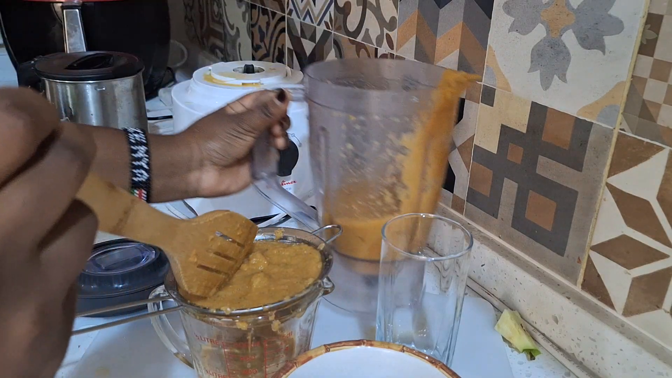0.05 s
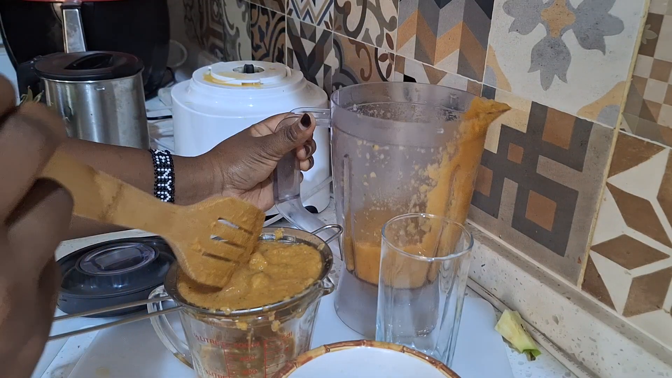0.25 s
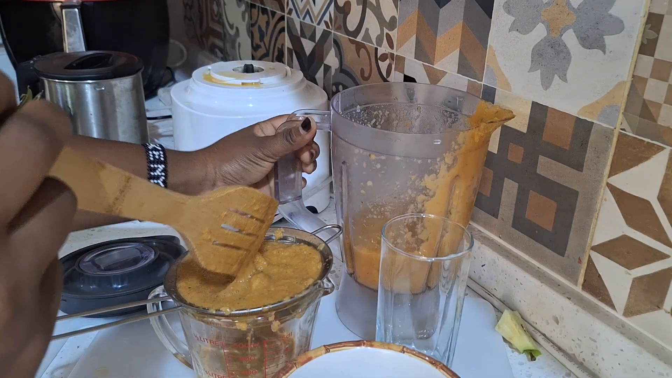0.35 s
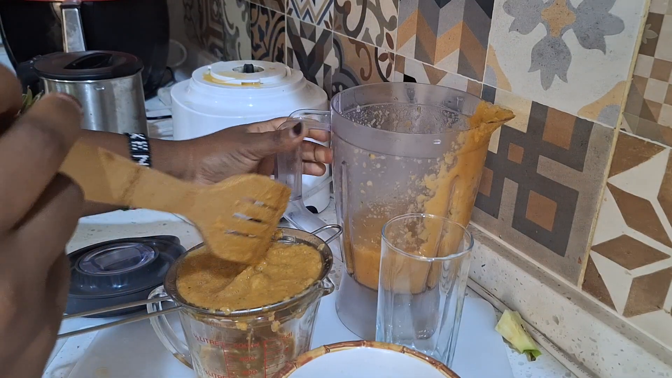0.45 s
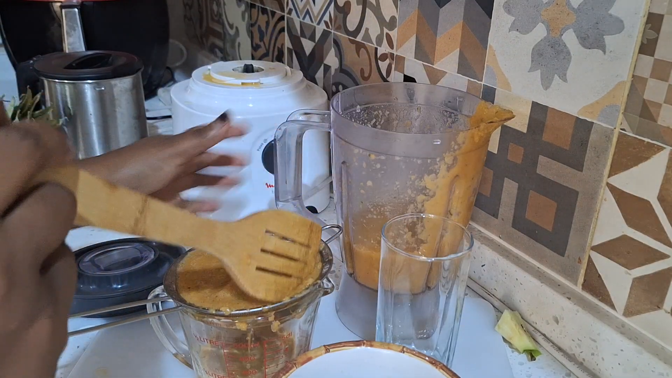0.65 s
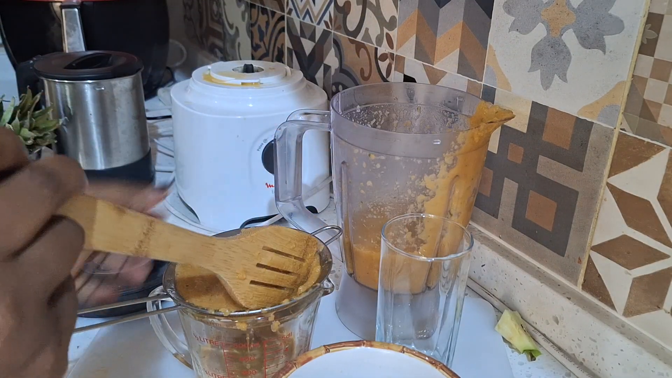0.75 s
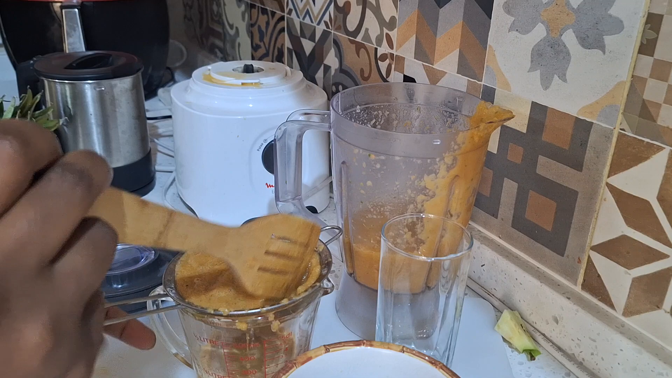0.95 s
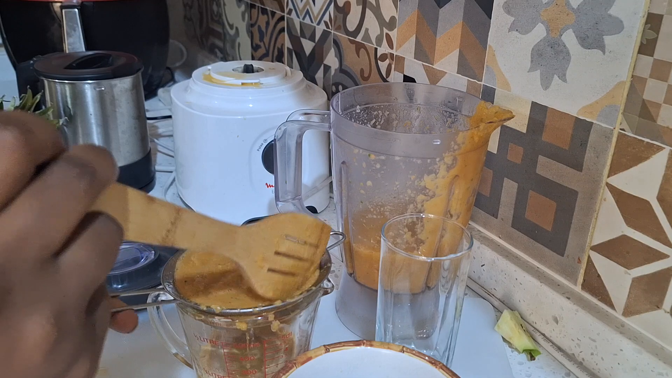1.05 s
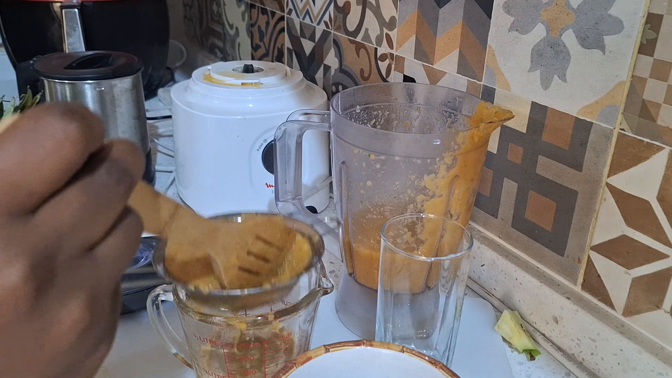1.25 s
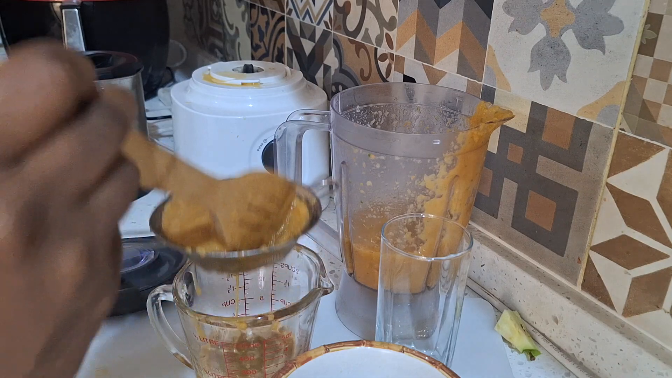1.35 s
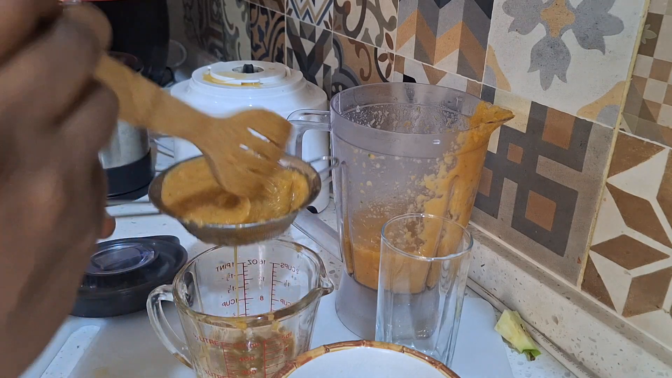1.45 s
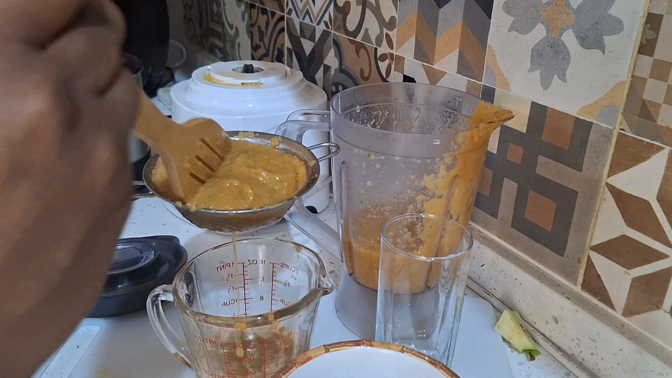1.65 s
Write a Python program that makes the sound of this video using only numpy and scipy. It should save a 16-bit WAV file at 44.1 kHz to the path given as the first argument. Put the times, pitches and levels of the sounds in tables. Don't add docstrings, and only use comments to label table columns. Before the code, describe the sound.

One loud, boomy plastic knock with a crack and short rattle early on, then near quiet over fridge hum, faint juice fizz and wooden spatula ticks, ending in small sieve taps and scrape on glass, in a tiled kitchen.

```python
import sys
import numpy as np
from scipy import signal
from scipy.fft import rfft, irfft
from scipy.io import wavfile
from scipy.ndimage import uniform_filter1d

SR = 44100
rng = np.random.default_rng(int(sys.argv[2]) if len(sys.argv) > 2 else 0)


def ratio_of_db(decibels):
    return 10 ** (np.asarray(decibels, float) / 20)


def output_pcm(signal):
    pcm = np.clip(np.atleast_2d(signal).T, -1, 1) * 32767
    wavfile.write(sys.argv[1], SR, np.round(pcm).astype(np.int16))


N = 74970

# f/Hz, correlation/1
EAR_LIKENESS = [(60, 1), (150, 0.81), (380, 0.57), (950, 0.073), (2400, 0.05), (15000, 0.016)]


def evened(x):
    return x / np.sqrt(np.mean(x ** 2) + 1e-20)


def read(points, hz):
    f, value = np.transpose(points)
    return np.interp(np.log(hz + 1), np.log(f + 1), value)


def curve_db(points, **ends):
    return np.interp(np.arange(N) / SR, *np.transpose(points), **ends)


def add(mix, s, sound):
    part = mix[..., round(max(s, 0) * SR):][..., :sound.shape[-1]]
    part += sound[..., :part.shape[-1]]


def colour(x, points):
    hz = np.fft.rfftfreq(x.shape[-1], 1 / SR)
    return irfft(rfft(x) * ratio_of_db(read(points, hz)), x.shape[-1])


def wander(rate_hz):
    t = np.arange(N) / SR
    ratios = np.geomspace(.1, 1, num=12)
    return evened(sum(np.sin(2 * np.pi * (f * rate_hz * t + rng.random())) / np.sqrt(f) for f in ratios))


def gritty(shape, base, gain, spread_db, rate_hz):
    peaks = ratio_of_db(spread_db * rng.exponential(1, N))
    return rng.standard_normal(shape) * (base + gain * peaks * (rng.random(N) < rate_hz / SR))


def ring(modes, rise_s):
    t = np.arange(12000) / SR
    out = np.zeros(len(t))
    for hz, db, t60 in modes:
        out += ratio_of_db(db - 60 * t / max(t60, .003)) * np.sin(2 * np.pi * hz * t)
    return out * (1 - np.exp(-t / rise_s))


def puff(points, t60):
    t = np.arange(4096) / SR
    z = rfft(rng.standard_normal(4096) * ratio_of_db(-60 * t / t60))
    even = irfft(z / np.sqrt(uniform_filter1d(abs(z) ** 2, size=30)), 4096)
    attack = np.minimum(t[:3000] / 0.000067, 1)
    burst = colour(even, points)[:3000] * attack
    return burst / np.sqrt(np.sum(burst ** 2) / (t60 * SR / 14))


def stroke(length_s, rise_s, fall_s):
    t = np.arange(0, length_s, 1 / SR)
    return np.clip(np.minimum(t / rise_s, (length_s - t) / fall_s), 0, 1)


def ticks(table):
    out = np.zeros(N)
    steps = np.linspace(-4, 4, num=17)
    for s, db, hz, octaves, t60 in table:
        bell = np.transpose([hz * 2 ** (steps * octaves), -4.3 * steps ** 2])
        add(out, s, ratio_of_db(db) * puff(bell, t60))
    return out


def to_left(x, lag_s, balance):
    hz = np.fft.rfftfreq(N, 1 / SR)
    return irfft(rfft(x) * np.exp(-2j * np.pi * hz * lag_s) * ratio_of_db(read(balance, hz)), N)


def air():
    # f/Hz, level/dB per Hz
    air_spectrum = [(20, -16), (45, -13), (105, -4), (170, -25.5), (550, -27), (900, -39), (2500, -55.5),
                    (16000, -65)]
    air_rms_db = -45.5
    # f/Hz, width/Hz, level/dB rms
    room_tones = [(63.2, 8.3, -50.5), (132, 36.5, -48.5), (331, 46, -62)]
    hz = np.fft.rfftfreq(N, 1 / SR)
    a, b = rfft(rng.standard_normal((2, N)))
    same = np.clip(read(EAR_LIKENESS, hz), -1, 1)
    base = ratio_of_db(read(air_spectrum, hz))
    density = ratio_of_db(2 * air_rms_db) * base ** 2 / np.mean(base ** 2)
    for f_hz, width_hz, db in room_tones:
        bump = np.exp(-.5 * ((hz - f_hz) / (width_hz / 2)) ** 2)
        density = density + ratio_of_db(2 * db) * bump / bump.mean()
    return irfft(np.array([a, same * a + np.sqrt(1 - same ** 2) * b]) * np.sqrt(density), N)


def hum():
    # f/Hz, level/dB rms
    motor_lines = [(100.5, -43.5), (147, -61), (197, -67.5)]
    # t/s, level/dB
    motor_load = [(0, 8), (.15, 6), (.55, 7), (.75, -2), (.88, 1.5), (.98, 7), (1.1, 0), (1.25, 5),
                  (1.381, 2), (1.449, 6.5), (1.55, 2), (1.65, 8)]
    out = np.zeros(N)
    for hz, db in motor_lines:
        turns = np.cumsum(hz + 1.055 * wander(3.87)) / SR + rng.random()
        out += ratio_of_db(db + 1.5 + 0.5 * wander(7.6)) * np.sin(2 * np.pi * turns)
    return ratio_of_db(curve_db(motor_load)) * out


def earlier():
    # f/Hz, level/dB per Hz
    tail_spectrum = [(120, -10), (200, 3), (600, 3.5), (1000, -10.5), (2000, -19.5), (3500, -29),
                     (6000, -49.5)]
    start_db, t60_s = -56.5, 2.1
    a, b = rng.standard_normal((2, N))
    tail = evened(colour(np.array([a + 1.0 * b, a - 0.7 * b]), tail_spectrum))
    return tail * ratio_of_db(start_db - 60 * np.arange(N) / SR / t60_s + 0.91 * wander(16.0))


def kitchen(x):
    # f/Hz, t60/s
    decay = [(100, 0.35), (350, 0.76), (560, 1), (1000, 0.56), (2000, 0.78), (3500, 0.66), (5500, .62),
             (8000, 0.52), (15000, 0.98)]
    # f/Hz, level/dB
    wet = [(100, -24), (210, -22), (350, -13), (560, -6), (1000, -5), (2000, -7), (3500, -6), (5500, -4),
           (8000, -9), (12000, -8)]
    taps = np.zeros((2, SR))
    at = np.arange(200, SR - 20, 20) + rng.integers(0, 20, (2, (SR - 201) // 20))
    np.put_along_axis(taps, at, rng.choice([-1., 1.], at.shape), 1)
    hz, t, z = signal.stft(taps, SR, nperseg=512)
    same = np.clip(read(EAR_LIKENESS, hz), -1, 1)[:, None]
    z = np.array([z[0], same * z[0] + np.sqrt(1 - same ** 2) * z[1]])
    t60 = read(decay, hz)[:, None]
    gain = ratio_of_db(read(wet, hz)[:, None] - 60 * t / t60) / np.sqrt(t60 * 145)
    tail = signal.istft(z * gain, SR, nperseg=512)[1]
    tail = tail * (np.arange(tail.shape[1]) > 150)
    return signal.fftconvolve(x[None], tail, axes=1)[:, :N]


def fizz():
    # t/s, level/dB
    fizz_curve = [(0, -105), (0.601, -100), (0.749, -74), (.95, -92), (1.16, -78), (1.27, -80), (1.4, -93),
                  (1.52, -79.5), (1.7, -84)]
    f, w = 8200, 700
    band = [(f - 2 * w, -30), (f - w / 2, -3), (f, 0), (f + w / 2, -3), (f + 2 * w, -30)]
    pops = gritty((2, N), .3, 1, 3.1, 500)
    return evened(colour(pops, band)) * ratio_of_db(curve_db(fizz_curve))


def squeaks():
    # t/s, length/s, level/dB, f/Hz
    squeak_events = [(.76, .07, -80, 1560), (.83, .065, -79, 2000), (.833, .07, -80, 2795),
                     (1.108, .045, -77, 1560), (1.14, .08, -80, 3600), (1.135, .08, -80, 4600),
                     (1.035, .05, -81, 3600), (1.21, .15, -80, 1470), (1.009, .095, -64, 1545),
                     (1.152, .063, -67.5, 1545), (1.677, .094, -46, 1545)]
    waver, fuzz, fuzz_hz = .005, 0.25, 60.6
    out, drift, flutter = np.zeros(N), wander(56.9), wander(94.0)
    span = int(SR / fuzz_hz / 4)
    slow = uniform_filter1d(uniform_filter1d(rng.standard_normal(N), span), span)
    rough = 1 + fuzz * evened(slow)
    for s, length_s, db, hz in squeak_events:
        shape = np.zeros(N)
        add(shape, s, stroke(length_s, 0.012, 0.04) ** 2)
        phase = 2 * np.pi * np.cumsum(hz * (1 + waver * drift)) / SR
        out += shape * ratio_of_db(db + 0.5 + 1.6 * flutter) * np.sin(phase)
    return out * rough


def rubs():
    # f/Hz, level/dB per Hz
    rub_spectrum = [(600, -60), (1500, -4), (2500, -5.5), (4000, 6.5), (6000, -5), (8200, -13.5),
                    (11000, 0.5), (16000, -13)]
    # t/s, length/s
    rub_strokes = [
        (.71, .17),
        (1.10, .2),
        (1.535, .08),
    ]
    rub_levels = [-66.5, -72, -68]
    grit = gritty(N, 1, 1.4, 3.0, 600)
    shape = np.zeros(N)
    for (s, length_s), db in zip(rub_strokes, rub_levels):
        add(shape, s, ratio_of_db(db) * stroke(length_s, .02, length_s * .6))
    return evened(colour(grit, rub_spectrum)) * shape * ratio_of_db(2 * wander(58.0))


def scrape():
    # f/Hz, level/dB per Hz
    scrape_spectrum = [(500, -20), (1000, -4), (2500, 0), (5000, -5), (8000, -10), (11000, -15),
                       (16000, -19)]
    # t/s, level/dB
    scrape_curve = [(1.59, -100), (1.593, -64), (1.611, -61), (1.614, -47.5), (1.63, -57), (1.65, -59),
                    (1.667, -57), (1.671, -53), (1.7, -63)]
    grit = gritty(N, 1, 1, 3.9, 900)
    return evened(colour(grit, scrape_spectrum)) * ratio_of_db(curve_db(scrape_curve, left=-200))


def utensil_ticks():
    # t/s, level/dB, centre f/Hz, breadth/octaves, t60/s
    tick_events = [(.378, -60, 9000, .7, .06), (.4303, -56.5, 10000, .55, .05), (.366, -45, 660, .15, .15),
                   (.7092, -52, 8000, .7, .025), (.7093, -55, 4150, .12, .03), (.7471, -63, 5800, .4, .014),
                   (.733, -68, 4500, .2, .012), (.797, -70, 11500, .04, .05), (.7645, -65, 9530, .3, .016),
                   (1.0532, -59, 8000, .8, .025), (1.1515, -66, 7000, .6, .022),
                   (1.2427, -60.5, 7500, .7, .022), (1.163, -69, 8400, .1, .02),
                   (1.4056, -72, 8000, .5, .013), (1.5387, -51, 5000, .25, .025),
                   (1.5389, -57, 8250, .15, .03), (1.5772, -57, 11000, .35, .02),
                   (1.5947, -56, 2570, .05, .026), (1.5941, -64, 4900, .3, .03),
                   (1.6139, -46, 700, .12, .07), (1.6119, -41, 3600, .6, .03),
                   (1.6121, -49, 8000, .5, .025), (1.622, -45, 3400, .8, .035),
                   (1.6692, -43, 1900, .2, .015), (1.6692, -54, 6500, .8, .025),
                   (1.6905, -38, 3500, .2, .012), (1.6903, -44, 9500, .8, .014)]
    more_tick_events = [(1.6120, -42, 2000, .2, .02), (1.6130, -40, 4900, .2, .02), (1.6125, -45, 950, .07, .06),
                        (1.6122, -47, 7500, .5, .025), (1.6170, -47, 5200, .2, .015),
                        (1.6228, -58, 9000, .8, .012), (1.6330, -50, 3000, .2, .015),
                        (1.6750, -48, 1700, .1, .02), (1.63, -57, 700, .12, .15), (1.6925, -36, 3900, .1, .012),
                        (1.6950, -37, 3300, .1, .012), (1.6910, -50, 8200, .1, .03),
                        (1.6915, -50, 12000, .15, .02), (1.5410, -55, 3600, .1, .02),
                        (1.3762, -70, 8200, .1, .03)]
    return ticks(tick_events) + ticks(more_tick_events)


def jug():
    # t/s, counter push level/dB, body knock level/dB, contact crack level/dB
    bounces = [
        (0.2127, -6.5, -6, -16),
        (0.224, -18.5, -18.5, -75),
        (.2520, -11, -12.5, -33.5),
        (0.2902, -18.5, -31.5, -55),
        (0.312, -24, -35, -65),
        (0.331, -18.5, -34.5, -41),
        (0.3693, -25, -42.5, -45),
        (.417, -32.5, -51, -45.5),
    ]
    # f/Hz, level/dB, t60/s
    counter_modes = [(76.6, -1.5, 0.15), (99.86, 0, 0.165), (122.9, 0.5, 0.152), (194.5, -7.5, 0.077)]
    # f/Hz, level/dB, t60/s
    body_modes = [(267.2, 0, 0.061), (284, -9, 0.078), (326.7, -1.5, 0.056), (417.3, -17.5, 0.087),
                  (562, -25, 0.16), (831, -9, 0.042), (901, -14, 0.052), (976, -12.5, 0.038),
                  (2067, -27.5, 0.073), (3080, -38, 0.06)]
    # f/Hz, level/dB per Hz
    crack_spectrum = [(500, 1), (900, 2), (1400, -4), (2100, -3.5), (4500, -10.5), (6300, -18), (9000, -23),
                      (16000, -57)]
    # t/s, level/dB, centre f/Hz, breadth/octaves, t60/s
    foot_chatter = [(.2103, -26.5, 5000, 0.22, 0.009), (.2108, -30.5, 7700, 0.08, 0.017),
                    (.2108, -23, 2090, 0.3, 0.034), (.2105, -47.5, 13100, 0.19, 0.037),
                    (.2120, -49, 10800, 0.049, 0.046), (.2150, -44, 8200, 0.081, 0.0087),
                    (.2155, -29, 3730, 0.24, 0.016), (.2190, -40, 4140, 0.27, .012),
                    (.2228, -45, 4470, 0.41, 0.0054), (.231, -23, 710, 0.34, 0.026),
                    (.2335, -40, 3080, 0.15, 0.089), (.2420, -54, 5500, 0.21, 0.0099),
                    (.2490, -47, 6000, 0.79, 0.018), (.2505, -33.5, 896, 0.57, 0.084),
                    (.2540, -58, 5200, 0.24, 0.022), (.2590, -61, 8100, 0.42, 0.011),
                    (.2680, -58, 5460, 0.22, 0.018)]
    crack_lead_s, knock_lead_s = .0025, 0.00229
    out, boom, body = ticks(foot_chatter), ring(counter_modes, 0.007), ring(body_modes, 0.0016)
    for s, push_db, knock_db, crack_db in bounces:
        add(out, s, ratio_of_db(push_db) * boom)
        add(out, s - knock_lead_s, -ratio_of_db(knock_db) * body)
        add(out, s - crack_lead_s, ratio_of_db(crack_db) * puff(crack_spectrum, 0.028))
    return out


def scene():
    low_cut = signal.butter(3, 64, "high", fs=SR, output="sos")
    heavy = signal.sosfilt(low_cut, jug())
    small = utensil_ticks() + squeaks() + rubs() + scrape()
    heavy_left = to_left(heavy, .00009, [(100, 1.5), (380, 1.0), (1300, -4), (2400, -5.0), (9000, -7)])
    small_left = to_left(small, -.00012, [(400, 11.5), (8000, 2), (15000, -25)])
    direct = np.array([heavy_left + small_left, heavy + small])
    small_wet_db = -6
    room = kitchen(heavy + ratio_of_db(small_wet_db) * small)
    return direct + room + hum() + air() + fizz() + earlier()


def top_cut(x):
    return signal.sosfilt(signal.butter(12, 16960, fs=SR, output="sos"), x)


def record(dry):
    edge = signal.firwin(511, 16000, window=("kaiser", 9), fs=SR)
    mix = signal.oaconvolve(dry, edge[None], "same")
    return top_cut(mix)


dry = scene()
out = record(dry)
output_pcm(out)
```